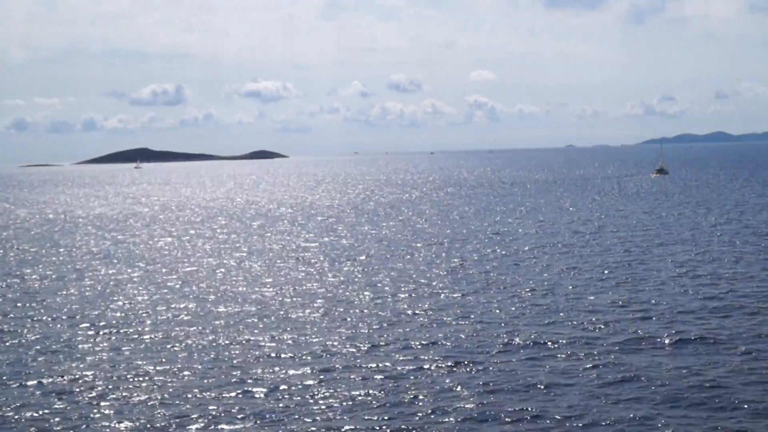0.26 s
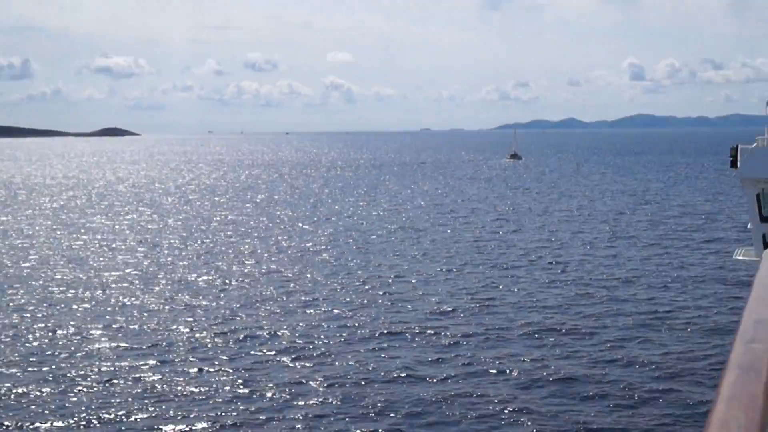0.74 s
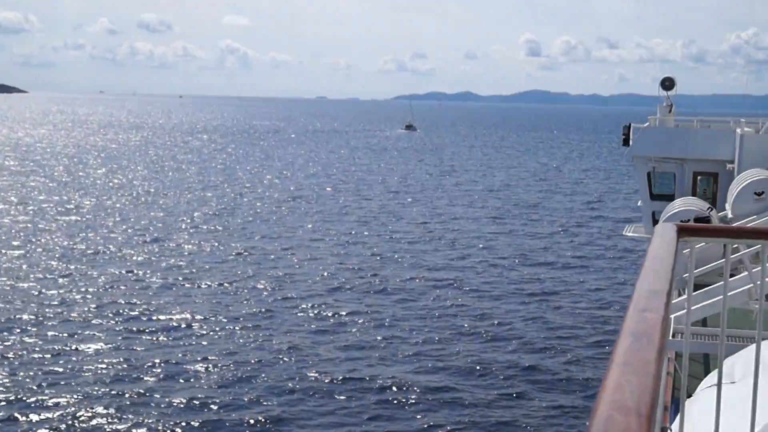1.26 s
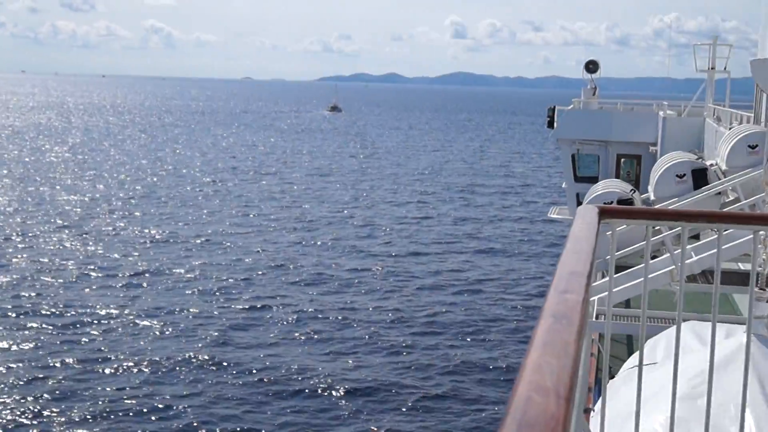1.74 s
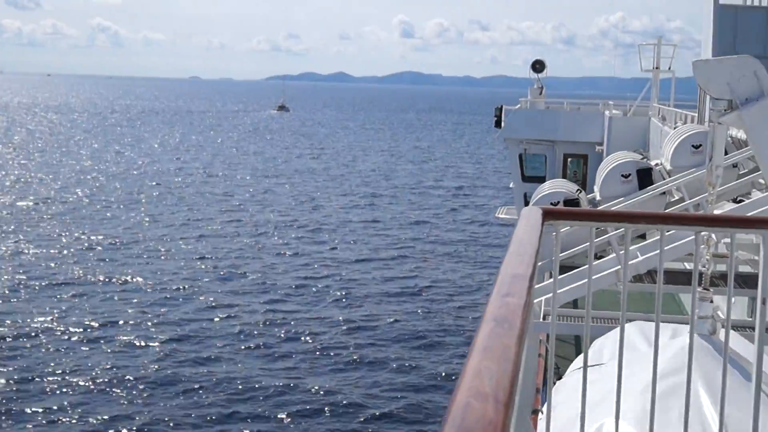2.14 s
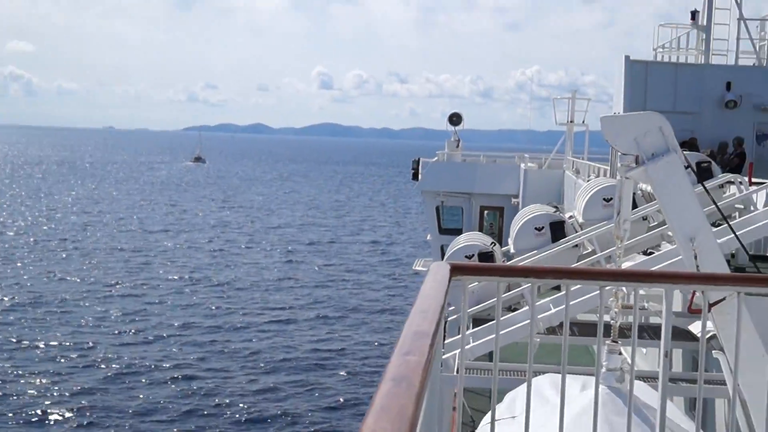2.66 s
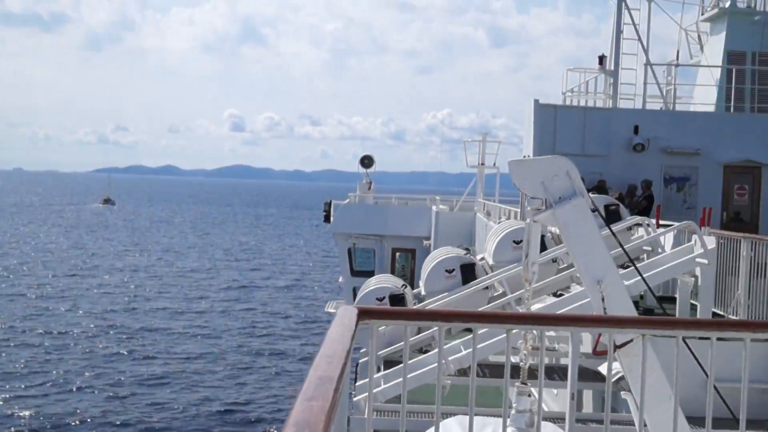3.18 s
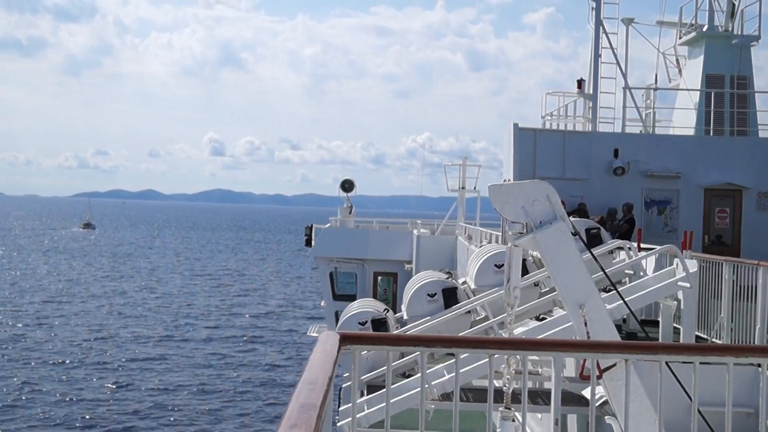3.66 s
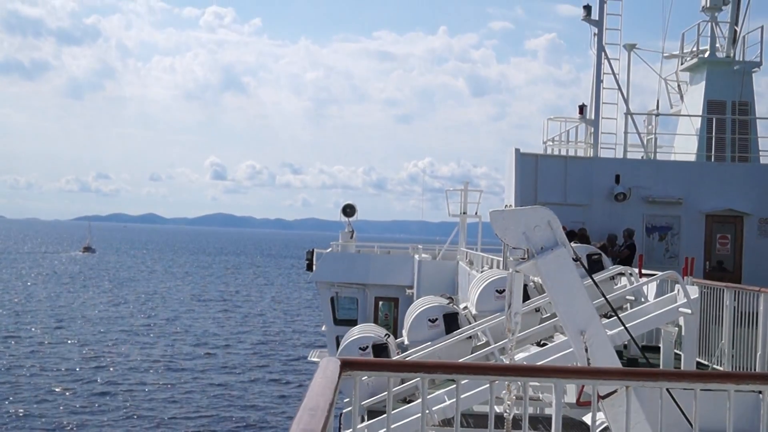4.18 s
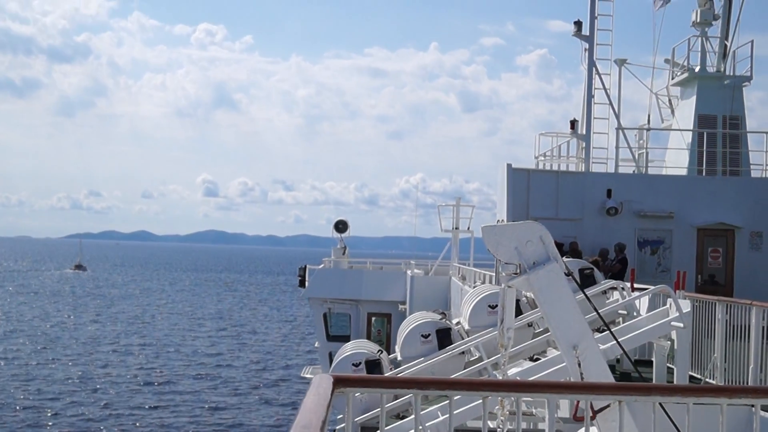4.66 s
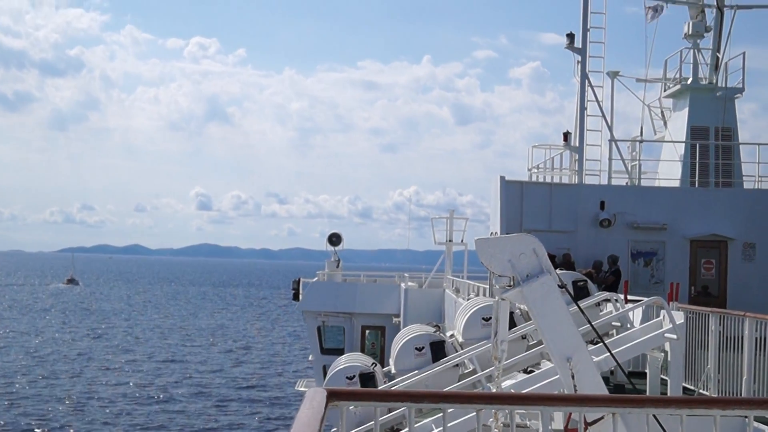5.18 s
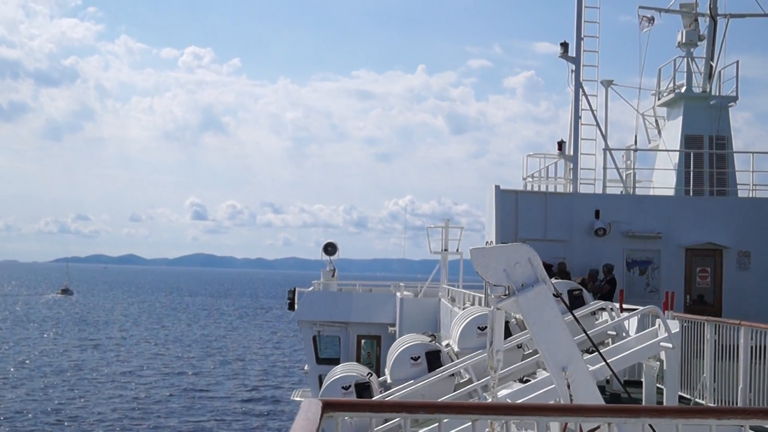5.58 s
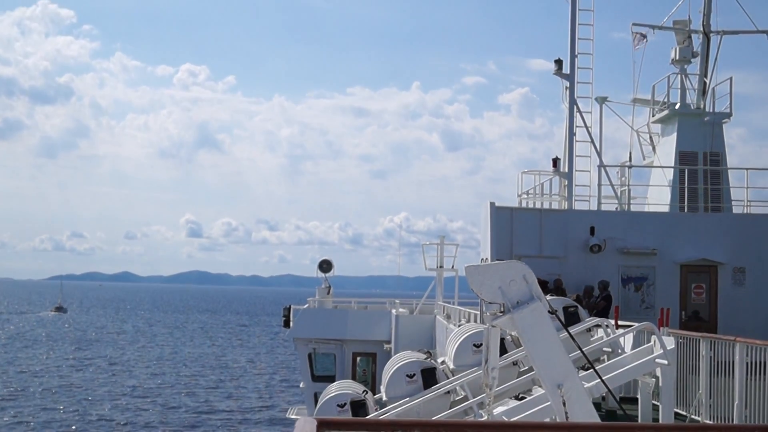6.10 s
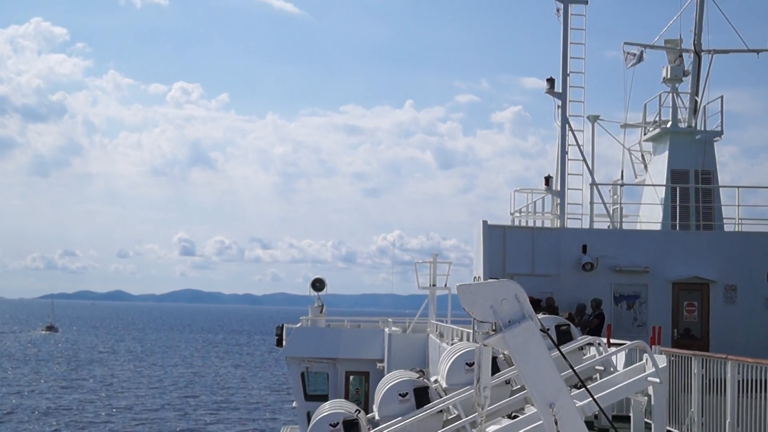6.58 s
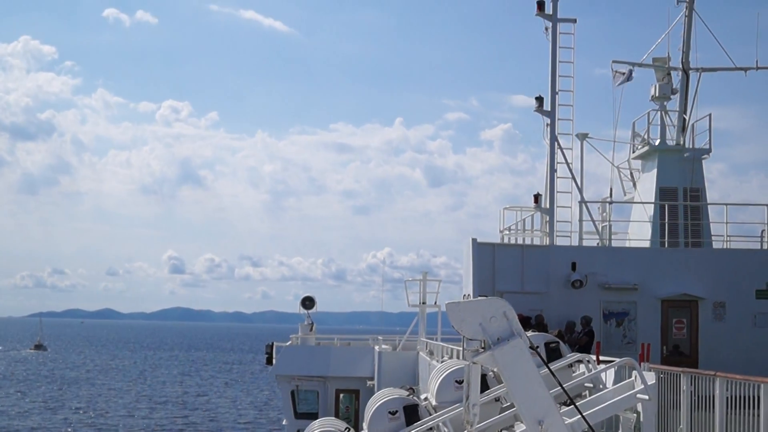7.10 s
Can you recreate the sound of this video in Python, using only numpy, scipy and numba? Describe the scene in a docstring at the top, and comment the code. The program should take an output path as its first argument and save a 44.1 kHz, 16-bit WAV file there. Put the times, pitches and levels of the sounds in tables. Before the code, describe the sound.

Continuous wind noise right on a microphone aboard a ship at sea. Deep heaving and rapid flutter dominate, with a duller rush and a faint fine roar above. The first third of a second slams and briefly chokes, then the buffeting runs on unevenly, with sharp dry snaps, muffled thuds and fine crackle, growing more jagged towards the end. No separate waves or engine can be heard.

```python
"""The open deck of a moving ship, where strong wind buffets a camera's microphone.
Shaped noise makes the wind: large eddies heave the diaphragm in slow surges, smaller ones flutter, rush and roar.
The hardest eddies slam it over with a dry crack or knock it against its stop with a dull thud; weaker slams
come more often in strong surges. Small ticks and a faint hiss run along, and a fast limiter holds down the peaks."""
import sys
import numpy as np
from scipy.fft import rfft, irfft, next_fast_len
from scipy.io import wavfile
from scipy.ndimage import uniform_filter1d, map_coordinates
from numba import njit

SR = 44100
rng = np.random.default_rng(int(sys.argv[2]) if len(sys.argv) > 2 else 0)


def generate_wav(signal):
    """Clip the signal to [-1, 1] and save it as 16-bit WAV at the path in sys.argv[1]."""
    frames = np.transpose(np.atleast_2d(signal))
    scaled = np.clip(frames, -1, 1) * 32767
    pcm = np.round(scaled).astype(np.int16)
    wavfile.write(sys.argv[1], SR, pcm)


N = 323694

# Slow surges of the wind, before buffeting and lumps: time_s, heave_db, rush_db
WIND_SURGES = [(0, -15, -24.5), (.16, -23, -26.5), (.3, -13, -25.5), (.55, -15.5, -23.5),
               (1.0, -13.5, -24.5), (1.5, -17.5, -26), (2.2, -19.5, -28), (2.7, -16.5, -26),
               (3.4, -15, -28), (4.2, -20.5, -26), (4.6, -16.5, -25.5), (5.4, -15, -27), (5.62, -21, -28),
               (6.1, -20, -24.5), (6.35, -14, -26), (6.8, -15.5, -27), (7.34, -19.5, -25.5)]
# How loud the flutter is, before it follows the surges: time_s, level_db
FLUTTER_LEVEL = [(.1, -11.5), (.39, -18.5), (.47, -13)]
# An opening gust that rises fast, drops sharply, swells again more weakly near .9 s and fades: time_s, level_db
OPENING_GUST = [(.12, -59.5), (.142, -21), (.21, -19), (.285, -23), (.302, -33), (.42, -37.5), (.9, -28),
                (1.3, -62)]
# Colours of the wind noise, each rescaled later by its own level: pitch_hz, level_db_per_hz
HEAVE_COLOUR = [(6, -27), (14, -10), (24, 2), (45, -4), (70, -11.5), (120, -24), (300, -66.5), (900, -120)]  # the slow rumble of large eddies
FLUTTER_COLOUR = [(25, -33), (60, -2), (90, -1), (125, 0), (190, -5), (270, -10.5), (400, -27),
                  (800, -64.5), (2000, -120)]  # the smaller eddies
RUSH_COLOUR = [(100, -26), (220, -2), (310, 2), (410, -2.5), (600, -13.5), (850, -24.5), (1200, -37.5),
               (2000, -54), (5000, -87)]  # smaller eddies still
ROAR_COLOUR = [(300, -17), (700, 2), (1200, -1), (1700, -8), (2500, -15.5), (3700, -22), (5600, -31),
               (9000, -41), (16000, -58)]  # the fine, steadier roar above the rumble
GUST_COLOUR = [(140, -17), (280, 7.5), (470, 3), (750, -13.5), (1100, -29), (2000, -45), (5000, -68.5)]  # the opening gust
# Eddies that knock the diaphragm against its stop, before the gains: start_s, strength_db
THUD_EVENTS = [(0.02, -15.5), (0.142, -32.5), (0.287, -21.5), (0.635, -30.5), (0.949, -17), (1.647, -20.5),
               (1.835, -25.5), (2.13, -25.5), (3.027, -18.5), (3.3, -23), (3.865, -24), (4.86, -22),
               (4.986, -18.5), (5.304, -27), (5.811, -23.5), (5.985, -25.5), (6.377, -23), (6.457, -22),
               (6.577, -23.5), (6.728, -18.5), (6.818, -26), (7.034, -23)]
# The hardest eddies, which overload the microphone, before the gains: start_s, crack_db, spit_db
HARD_SLAMS = [(0.0209, -44, -60), (0.0662, -30, -53), (0.3002, -33.5, -45), (0.5382, -29, -58.5),
              (0.639, -30.5, -53.5), (0.6693, -28, -53), (0.871, -31, -53.5), (0.952, -33, -53),
              (1.375, -40.5, -43.5), (1.6616, -29, -52.5), (1.9036, -31, -52.5), (2.138, -27.5, -52),
              (2.2214, -31.5, -53.5), (2.4128, -38.5, -45.5), (2.5033, -40, -47.5), (2.656, -26.5, -47.5),
              (2.809, -34.5, -53.5), (2.8976, -33, -53.5), (3.04, -28.5, -48.5), (3.1508, -28, -46),
              (3.3206, -25.5, -48.5), (3.3967, -24.5, -50), (3.4917, -37.5, -49), (3.5185, -26.5, -49),
              (3.7628, -29.5, -54.5), (3.9353, -28, -47), (4.1023, -29.5, -54), (4.2468, -33.5, -52.5),
              (4.3712, -35.5, -48.5), (4.4821, -31.5, -44), (4.7797, -32, -54.5), (4.869, -28, -57),
              (4.9531, -33.5, -46.5), (4.9867, -31, -45.5), (5.1244, -33.5, -42.5), (5.23, -25.5, -51),
              (5.3217, -28, -48), (5.4122, -23.5, -46), (5.452, -23, -43.5), (5.4929, -35, -52.5),
              (5.9865, -31.5, -51.5), (5.9966, -29.5, -50.5), (6.101, -32, -48), (6.2785, -26, -46),
              (6.3492, -28.5, -47.5), (6.3987, -26.5, -56.5), (6.4674, -36.5, -53), (6.5248, -31.5, -43),
              (6.579, -23.5, -45.5), (6.7137, -30.5, -46.5), (6.7485, -26, -45.5), (6.787, -33.5, -45.5),
              (6.8684, -27.5, -45), (7.0794, -31.5, -58), (7.1734, -32, -46.5), (7.202, -34, -44)]
# Long pushes that pin the diaphragm and choke the flutter, before the limiter:
# start_s, length_s, depth_db, push_share_of_full_scale
LONG_PUSHES = [(0.03, .026, 7.5, .55), (0.064, 0.047, 11, .5), (0.296, 0.039, 16, 1.5)]
# Colours of the short sounds: pitch_hz, level_db
CRACK_COLOUR = [(100, -13), (400, -3), (1000, 11), (2000, 6.5), (4000, -1), (7000, -5.5), (11000, -14),
                (16000, -28.5)]  # the dry snap
SPIT_COLOUR = [(500, -31.5), (3000, 1), (7000, -4), (12000, -1.5), (16000, -3)]  # the bright spit on top of a snap
STOP_COLOUR = [(100, -5), (400, 9.5), (700, 1.5), (1400, -13), (3000, -26.5), (6000, -35), (16000, -51)]  # the diaphragm meeting its stop
SNAP_DELAY_S = .0009  # from the middle of a slam to its snap
TOP_HZ = 16400  # the camera's band limit


def amp(db):
    """Turn decibels into a gain."""
    return 10 ** (np.asarray(db) / 20)


def unit(x):
    """Scale to an average (rms) level of 1."""
    return x / np.sqrt(np.mean(x ** 2) + 1e-20)


def curves(rows):
    """Draw each column after the time as a curve with one value per sample."""
    times, *columns = np.transpose(rows)
    return [np.interp(np.arange(N) / SR, times, column) for column in columns]


def wobble(rate_hz):
    """Make a smooth random curve through rate_hz random points a second."""
    points = rng.standard_normal(int(N * rate_hz / SR) + 4)
    return map_coordinates(points, [np.arange(N) * rate_hz / SR])


def pair(size, apart):
    """Draw random values shared by two channels, plus a part of each one's own."""
    return rng.standard_normal(size) + apart * rng.standard_normal((2, size))


def filtered(x, response):
    """Multiply each frequency of x by the response there."""
    length = next_fast_len(N + SR // 2)
    hz = np.fft.rfftfreq(length, 1 / SR)
    return irfft(rfft(x, length) * response(hz), length)[..., :N]


def coloured(x, colour):
    """Filter x through a colour table, its points joined on a log pitch axis."""
    pitch, db = np.transpose(colour)
    return filtered(x, lambda hz: amp(np.interp(np.log(hz + 1), np.log(pitch + 1), db)))


def turbulence(colour, size):
    """Make rms 1 noise that flutters freely but keeps its power even over about size samples."""
    x = coloured(rng.standard_normal(N), colour)
    power = uniform_filter1d(uniform_filter1d(x * x, size), size)
    return unit(x / np.sqrt(np.abs(power) + 1e-20))


def airflow(flutter_follow=0.04, lumpy_db=2.2, roar_db=-49.0, roar_follow=0.11, buffet_db=1.32, buffet_rate_hz=15):
    """Eddies at the port press on the diaphragm: slow heave, flutter, rush, a fine roar and the opening gust."""
    heave_db, rush_db = curves(WIND_SURGES)
    # flutter and roar follow the surges only a little
    flutter_db = curves(FLUTTER_LEVEL)[0] + flutter_follow * (heave_db - np.median(heave_db))
    fine_db = roar_db + roar_follow * (rush_db - np.median(rush_db))
    heave = amp(heave_db) * turbulence(HEAVE_COLOUR, size=6000)
    # small eddies arrive in lumps that all of them share
    lumps = amp(lumpy_db * wobble(80))
    flutter = amp(flutter_db) * unit(turbulence(FLUTTER_COLOUR, size=4500) * np.sqrt(lumps))
    rush = amp(rush_db) * unit(turbulence(RUSH_COLOUR, size=3000) * lumps)
    roar = amp(fine_db) * unit(turbulence(ROAR_COLOUR, size=2500) * lumps)
    gust = amp(curves(OPENING_GUST)[0]) * turbulence(GUST_COLOUR, size=1500) * lumps
    # the larger eddies swell and sag together several times a second
    buffet = amp(buffet_db * wobble(buffet_rate_hz))
    return buffet * (heave + flutter) + rush + roar + gust


def faint_hiss():
    """Steady white noise, separate in each channel."""
    return amp(-74) * rng.standard_normal((2, N))


def crackle(air, overloads, rate_hz=60, tick_db=-32, spread_db=4.0, cluster_s=0.049, bright_share=0.22, bright_db=-3):
    """Small snaps and spits, likeliest at high pressure and in the company of slams."""
    t = np.arange(N) / SR
    unrest = 1 + sum(np.exp(-np.abs(t - s) / cluster_s) for s, _, _ in overloads)
    strain = air ** 2 * unrest
    fires = rng.random(N) < strain / np.mean(strain) * rate_hz / SR
    sizes = amp(tick_db + spread_db * np.clip(rng.standard_normal(N), -2, 2))
    # ticks take the sign of the pressure, varied at random in each channel
    ticks = fires * np.sign(air) * sizes * (1 + .5 * rng.standard_normal((2, N)))
    bright = rng.random(N) < bright_share
    return coloured(ticks * ~bright, CRACK_COLOUR) + amp(bright_db) * coloured(ticks * bright, SPIT_COLOUR)


def sucks(air, pull_db=15, half_s=.0022, calm=.4):
    """The eddy behind each thud briefly sucks the diaphragm out to its stop, between two weaker pushes."""
    out = air.copy()
    for s, db in THUD_EVENTS:
        i = np.arange(max(round(s * SR) - SR // 20, 0), min(round(s * SR) + SR // 20, N))
        u = (i / SR - s) / half_s - .5
        pull = min(amp(db + pull_db), 1) * np.exp(-u ** 2 / 2)
        # a pulled diaphragm follows the other eddies less
        out[i] = out[i] * (1 - min(calm, 1) * pull) - pull * (1 - u ** 2)
    return out


def thuds(thud_gain_db=29, rebound_s=0.0026, skew_s=.00007, chatter_db=-13, chatter_s=.004):
    """The diaphragm meets its stop, chatters there and leaves it a few milliseconds later."""
    knocks = np.zeros((2, N + SR))
    for s, db in THUD_EVENTS:
        start, force = round(s * SR), amp(db + thud_gain_db)
        stay_s = np.abs(rebound_s * rng.uniform(0.45, 1.2) + rng.normal(0, skew_s, 2))
        stay = (SR * stay_s).astype(int)
        knocks[:, start] += force
        knocks[[0, 1], start + stay] += force * rng.uniform(0.1, 0.14)
        touches = start + (rng.exponential(chatter_s, size=4) * SR).astype(int)
        knocks[:, touches] += force * amp(chatter_db) * pair(size=4, apart=0.36)
    return coloured(knocks[:, :N], STOP_COLOUR)


def chance_times(count, follow=1.5, grow_db_per_s=0.96):
    """Pick uneven moments that crowd into the surges and favour later times."""
    odds = np.cumsum(amp(follow * curves(WIND_SURGES)[0] + grow_db_per_s * np.arange(N) / SR))
    # one random pick in each equal slice of the total odds
    picks = (np.arange(count) + rng.random(count)) / count
    return np.searchsorted(odds / odds[-1], picks) / SR


def lesser_slams(crack_db=-42, spit_db=-53, crack_spread_db=3, spit_spread_db=6):
    """Weaker overloads at random, from dull to bright, as rows of start_s, crack_db, spit_db."""
    s = chance_times(count=40)
    luck = np.clip(rng.standard_normal((len(s), 2)), -1.5, 1.5)
    return np.column_stack([s, [crack_db, spit_db] + luck * [crack_spread_db, spit_spread_db]])


def slams(air, overloads, swing_db=19, edge_s=0.00046, relax_s=0.014, calm=0.19):
    """A hard eddy sucks the diaphragm out, then throws it over; the pressure leaks away."""
    out = air.copy()
    for s, crack_db, _ in overloads:
        i = np.arange(max(round(s * SR) - SR // 10, 0), min(round(s * SR) + SR // 10, N))
        t = i / SR - s
        force = min(amp(crack_db + swing_db), .5) * np.exp(-(t / relax_s) ** 2)
        # near its stop the diaphragm follows the other eddies less
        out[i] = out[i] * (1 - min(calm, 1) * 2 * force) + force * np.tanh(t / edge_s)
    return out


def cracks(overloads, crack_gain_db=12.5, spit_gain_db=25, kink_gain_db=29, skew_s=.00007,
           spit_life_s=0.000079, ragged_s=0.0033, scatter_db=-17):
    """Each overload is one dry snap with a bright spit, weak snaps around it and dull kinks before it."""
    snaps, spits, kinks = np.zeros((3, 2, N + SR))
    t = np.arange(128) / SR
    for s, crack_db, spit_db in overloads:
        start = max(round((s + SNAP_DELAY_S) * SR), 0)
        # the two channels snap a hair apart
        lag = np.abs(rng.normal(0, skew_s, 2) * SR).astype(int)
        snaps[[0, 1], start + lag] -= amp(crack_db + crack_gain_db)
        near = np.abs(start + rng.normal(0, ragged_s, size=3) * SR).astype(int)
        snaps[:, near] += amp(crack_db + crack_gain_db + scatter_db) * pair(size=3, apart=0.78)
        # the stop is met just before the snap
        stops = np.abs(start - rng.exponential(ragged_s, size=3) * SR).astype(int)
        kinks[:, stops] += amp(crack_db + kink_gain_db) * pair(size=3, apart=0.13) / 2
        # the spit is a tiny burst of noise that dies away at once
        burst = pair(size=len(t), apart=.7) * np.exp(-t / spit_life_s)
        spits[:, start:start + len(t)] += amp(spit_db + spit_gain_db) * burst / np.linalg.norm(burst[0])
    bright = coloured(spits[:, :N], SPIT_COLOUR)
    return coloured(snaps[:, :N], CRACK_COLOUR) + bright + coloured(kinks[:, :N], STOP_COLOUR)


def choked(air, grip_s=0.0015, settle=0.52):
    """A long push pins the diaphragm at once; it swings back and lets the small eddies in again."""
    t = np.arange(N) / SR
    for s, length, depth_db, push in LONG_PUSHES:
        u = (t - s) / length
        held = (1 + np.tanh((t - s) / grip_s)) / 2
        swing = push * held * np.cos(np.pi * u) * np.exp(-settle * u ** 2)
        air = air * amp(-depth_db * held * np.exp(-u ** 2)) + swing
    return air


def scene():
    """Wind pressure nearly equal in both channels, its overloads and a faint hiss."""
    flow = airflow()
    overloads = np.vstack([HARD_SLAMS, lesser_slams()])
    air = choked(sucks(slams(flow, overloads)))
    sensitivity = amp([[-.06], [.06]])  # one channel is a touch louder
    return sensitivity * air + cracks(overloads) + thuds() + crackle(air, overloads) + faint_hiss()


@njit
def limiter(x, top, step, recover):
    """The gain drops a step whenever the output would pass top, and otherwise creeps back."""
    y, gain = np.empty_like(x), 1.0
    for i in range(len(x)):
        if abs(x[i]) * gain > top:
            gain *= step
        else:
            gain += (1 - gain) * recover
        y[i] = x[i] * gain
    return y


def record(dry, top=.93, step_db=0.05, release_s=0.031):
    """The camera limits each channel and keeps nothing above its band limit."""
    ceiling, step = min(float(top), 1.0), float(amp(-abs(step_db)))
    recover = 1 / (release_s * SR)
    held = np.array([limiter(np.ascontiguousarray(x), ceiling, step, recover) for x in dry])
    return filtered(held, lambda hz: hz < TOP_HZ)


dry = scene()
out = record(dry)
generate_wav(out)
```